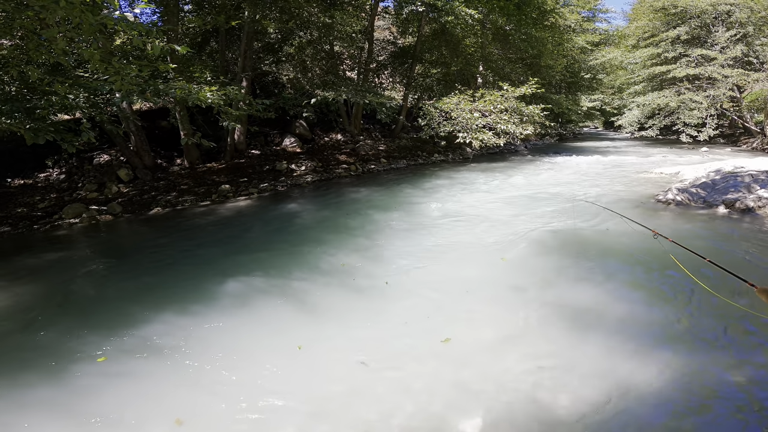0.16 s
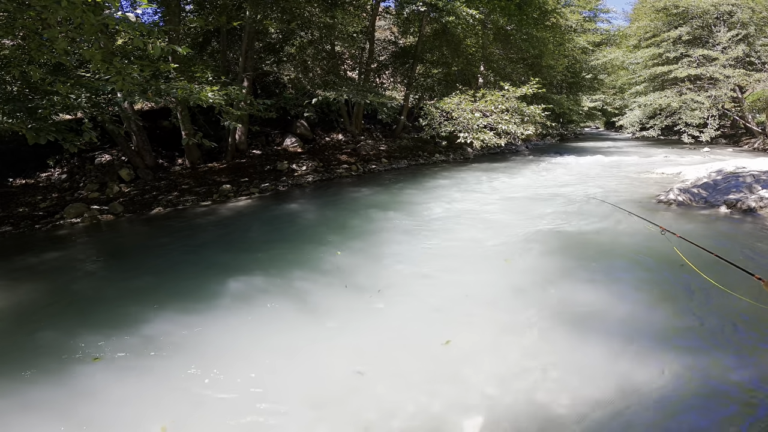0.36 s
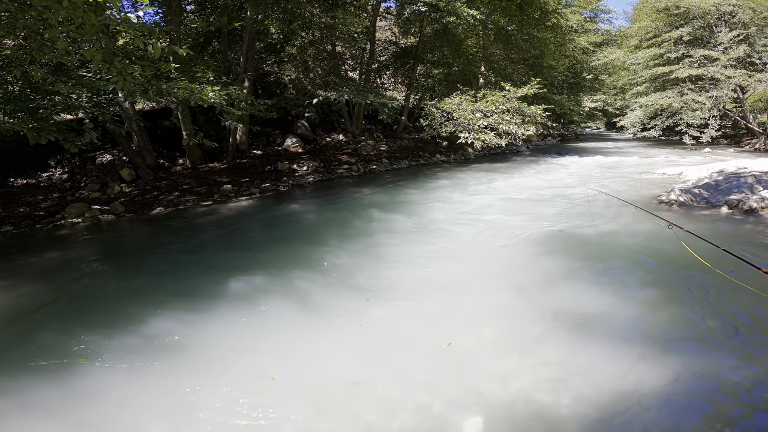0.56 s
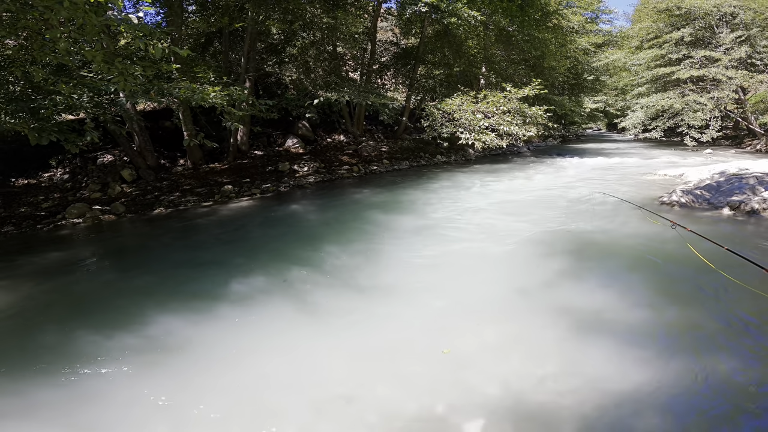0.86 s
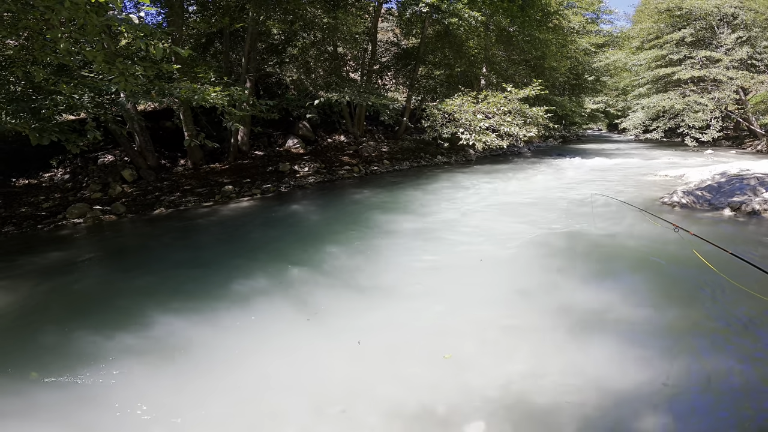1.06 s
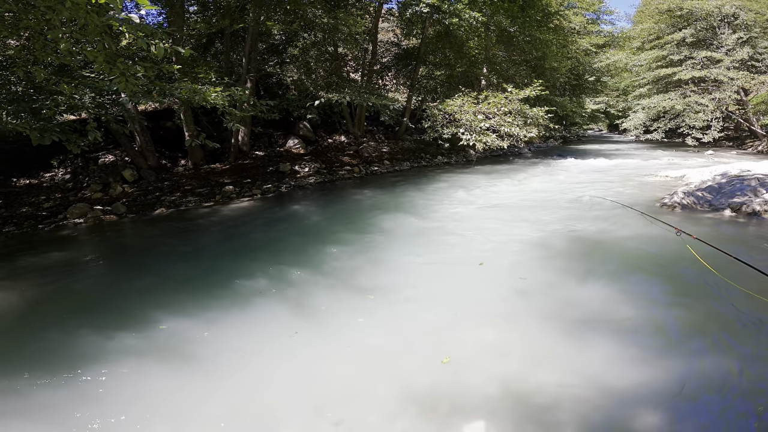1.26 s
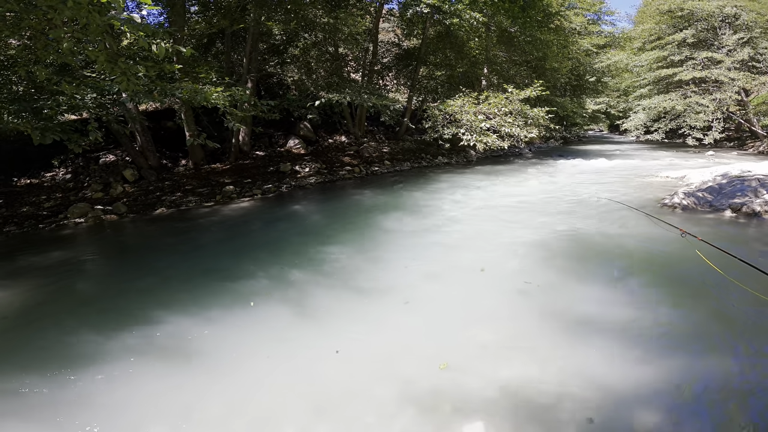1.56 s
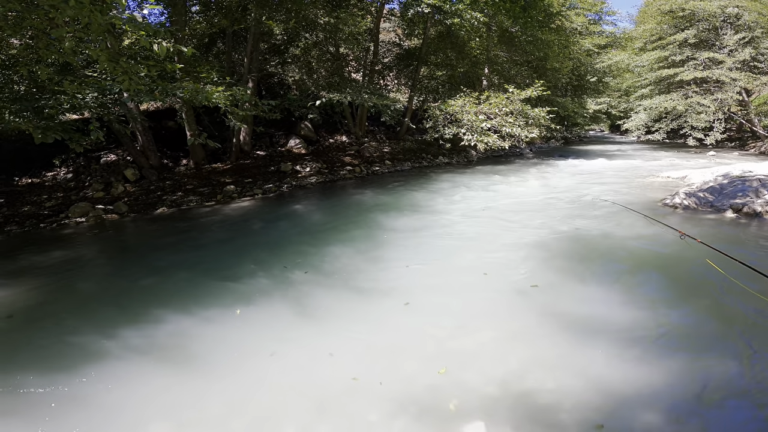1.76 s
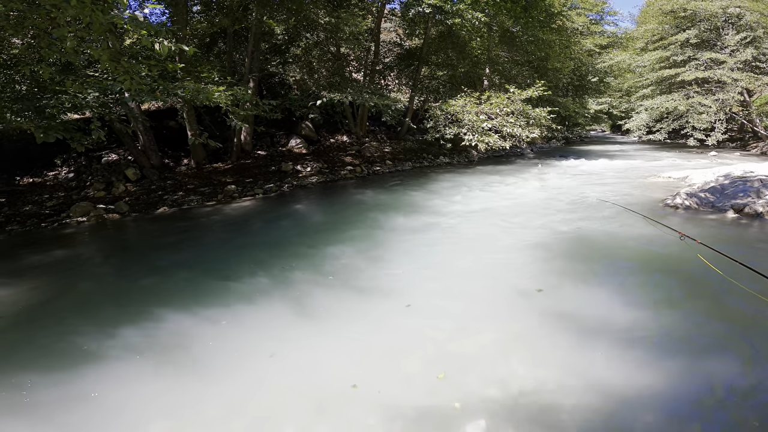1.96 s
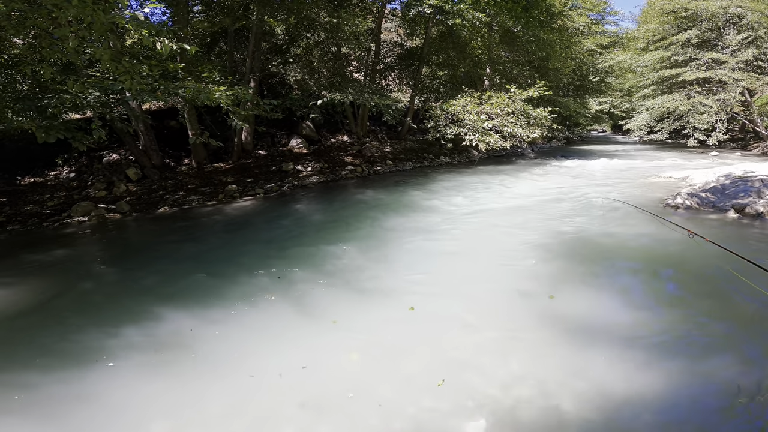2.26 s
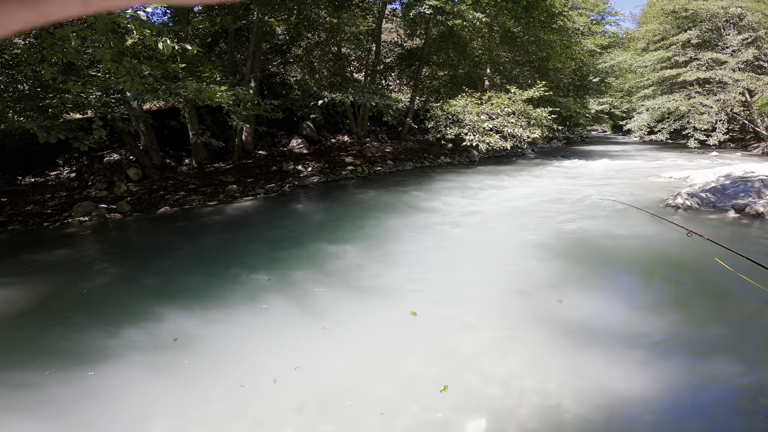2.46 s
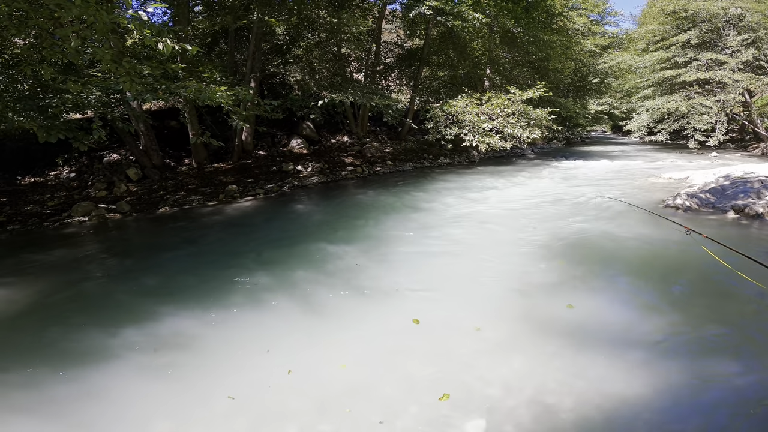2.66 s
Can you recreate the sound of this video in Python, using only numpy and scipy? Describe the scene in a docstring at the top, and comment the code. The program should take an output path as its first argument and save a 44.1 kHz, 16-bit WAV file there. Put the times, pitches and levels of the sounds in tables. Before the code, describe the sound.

Steady rush of a fast river heard from some way off, low and gurgling with scattered watery plops.

```python
"""The steady, dull roar of river rapids, heard from some way off: two bands of coloured noise.
Nearer bubbles gurgle inside the roar, a few single plops stand out and a short run of like bubbles
swells up; each bubble is a fading sine that rises in pitch. A smooth spray hiss of higher noise lies
above, and below is a lumpy rumble of low noise with one soft thump."""
import sys
import numpy as np
from scipy import signal
from scipy.fft import rfft, irfft, next_fast_len
from scipy.io import wavfile
from scipy.ndimage import uniform_filter1d, map_coordinates

SR = 44100
rng = np.random.default_rng(int(sys.argv[2]) if len(sys.argv) > 2 else 0)


def materialize(psi):
    """Save the field psi as 16-bit PCM at rate SR to the path in sys.argv[1].

    A 1-D psi becomes a single channel; in a 2-D psi each row is a channel.
    """
    bounded = np.clip(np.atleast_2d(psi).T, -1, 1)
    quanta = np.round(bounded * 32767).astype(np.int16)
    wavfile.write(sys.argv[1], SR, quanta)


N = 123479  # length in samples

# How loud the roar is over time: t/s, deep level/dB, upper level/dB
ROAR_LEVELS = [(0, -33.5, -35), (.15, -36.5, -35), (.4, -40, -33.5), (.53, -32.5, -34.5), (.66, -37.5, -34),
               (.85, -36.5, -34.5), (1.06, -35.5, -34.5), (1.25, -34.5, -34), (1.5, -37, -35),
               (1.72, -33.5, -33.5), (1.95, -35.5, -33.5), (2.3, -35.5, -34.5), (2.5, -36.5, -34),
               (2.8, -38, -34)]
# Tone colour of the deep roar: f/Hz, relative level/dB (per Hz)
DEEP_ROAR_COLOUR = [(70, -48), (100, -15), (130, -9.5), (180, -1.5), (300, -0.5), (380, -2.5), (520, -54),
                    (900, -85)]
# Tone colour of the upper roar: f/Hz, relative level/dB (per Hz)
UPPER_ROAR_COLOUR = [(200, -56), (290, -9.5), (375, -4), (490, 0), (640, -6.5), (850, -7), (1120, -15),
                     (1500, -23.5), (3000, -100)]
GURGLE_DB = -9  # gurgle level relative to the upper roar's noise


def roar():
    """Countless bubbles merge into noise: a deep band, and an upper band with the gurgle mixed in."""
    deep_db, upper_db = curves(ROAR_LEVELS)
    deep = rush(DEEP_ROAR_COLOUR, patchy_db=0.3)
    upper_noise = rush(UPPER_ROAR_COLOUR, patchy_db=-0.43)
    upper = unit(upper_noise + amp(GURGLE_DB) * gurgle(count=500))
    return amp(deep_db) * deep + amp(upper_db) * upper


GURGLE_HZ, GURGLE_SPREAD = 478.3, 0.2973  # middle pitch, spread of the natural log of pitch
STRENGTH_SCATTER_DB = 1.5  # scale of the random differences in strength


def gurgle(count):
    """Nearer bubbles ring at random moments and pitches, a few much stronger than the rest."""
    draw = rng.random((count, 2))
    start_s = draw[:, 0] * N / SR
    strength_db = -STRENGTH_SCATTER_DB * np.log(draw[:, 1] + 0.0013)  # the offset caps the strongest
    pitch_hz = GURGLE_HZ * np.exp(GURGLE_SPREAD * rng.standard_normal(count))
    return unit(bubbles(start_s, strength_db, pitch_hz))


# Single gulps and plops, one bubble a row: t/s, strength level/dB, starting f/Hz
PLOP_EVENTS = [(0.126, -20.5, 370), (0.5235, -15.5, 800), (0.657, -17.5, 366), (1.042, -19, 360),
               (1.098, -20, 760), (1.121, -21.5, 797), (1.595, -18, 377), (1.682, -22, 375),
               (1.73, -19.5, 362), (2.5, -18, 483), (2.555, -20.5, 395), (2.6, -22, 490)]


def plops():
    """Single large bubbles close by, each ringing at its own pitch."""
    start_s, strength_db, pitch_hz = np.transpose(PLOP_EVENTS)
    return bubbles(start_s, strength_db, pitch_hz)


SWELL_S, SWELL_WIDTH_S = 2.53, .06  # middle and spread in time, seconds
SWELL_DB, SWELL_HZ, SWELL_SPREAD = -30, 508, 0.12  # middle strength, middle pitch, log-pitch spread


def swell(count):
    """A short run of bubbles of nearly one size, so their pitches lie close together."""
    draw = rng.standard_normal((count, 3))
    start_s = np.clip(SWELL_S + SWELL_WIDTH_S * draw[:, 0], 0, N / SR)
    strength_db = SWELL_DB + 2 * draw[:, 1]
    pitch_hz = SWELL_HZ * np.exp(SWELL_SPREAD * draw[:, 2])
    return bubbles(start_s, strength_db, pitch_hz)


CYCLES, RISE, ATTACK_CYCLES = 30, .1, 3.5  # cycles to fade 60 dB, share of pitch gained by then, soft start


def bubbles(start_s, strength_db, pitch_hz):
    """Each bubble is a damped sine that starts softly and rises in pitch."""
    k = np.arange(SR // 10)  # sample numbers within one bubble
    turns = pitch_hz[:, None] * k / SR
    fade = amp(strength_db[:, None] - 60 * turns / CYCLES)
    soft_start = 1 - np.exp(-turns / ATTACK_CYCLES)
    rising_turns = turns * (1 + .5 * RISE * turns / CYCLES)
    tone = fade * soft_start * np.sin(2 * np.pi * rising_turns)
    # add every bubble into one track at its own starting sample
    places = (start_s * SR).astype(int)[:, None] + k
    return np.bincount(places.ravel(), tone.ravel(), N + SR)[:N]


# Tone colour of the spray: f/Hz, relative level/dB (per Hz)
SPRAY_NOISE_COLOUR = [(300, -82), (700, -5.5), (1100, -2), (1600, -2), (2400, -8.5), (3600, -11),
                      (5600, -16.5), (7300, -21.5), (9500, -30), (11700, -38.5), (12700, -36.5),
                      (13900, -45), (15700, -50)]
SPRAY_DB = -42.5  # middle level


def spray():
    """Spray is a smooth hiss: higher noise whose level drifts only slightly."""
    level_db = SPRAY_DB + 0.19 * wobble(6.3)
    return amp(level_db) * rush(SPRAY_NOISE_COLOUR, patchy_db=0.17)


# How loud the rumble is over time: t/s, level/dB
RUMBLE_LEVELS = [(0.05, -50), (0.3, -59.5), (0.35, -46), (0.42, -61), (0.46, -47), (0.56, -54), (0.66, -70),
                 (0.73, -52), (0.75, -63), (1.01, -66), (1.03, -54), (1.48, -62), (1.52, -39), (1.56, -53),
                 (1.75, -55), (2.03, -63), (2.05, -41), (2.11, -54), (2.6, -53), (2.655, -45.5),
                 (2.72, -60), (2.77, -58)]
# Tone colour of the rumble: f/Hz, relative level/dB (per Hz)
RUMBLE_NOISE_COLOUR = [(10, -30), (20, -24), (40, -16), (70, -3.5), (105, -8), (140, -7.5), (240, -86)]
LUMP_DB, LUMPS_PER_S = 4, 28  # depth of the surges, random curve points per second


def rumble():
    """Heavy water surging round the boulders: low noise with quick random changes of level."""
    level_db, = curves(RUMBLE_LEVELS)
    surges = amp(LUMP_DB * wobble(LUMPS_PER_S))
    lumpy = unit(surges * rush(RUMBLE_NOISE_COLOUR, patchy_db=-0.7))
    return amp(level_db) * lumpy


THUMP_S, THUMP_WIDTH_S, THUMP_DB, THUMP_HZ = 2.485, 0.014, -44, 22  # middle, bell width, peak, pitch


def thump():
    """One soft low push: a slow cosine under a bell-shaped swell."""
    t = np.arange(N) / SR - THUMP_S
    bell = np.exp(-.5 * (t / THUMP_WIDTH_S) ** 2)
    return amp(THUMP_DB) * bell * np.cos(2 * np.pi * THUMP_HZ * t)


def rush(colour, patchy_db):
    """Rushing water as coloured noise of rms 1, with random gain patches in time and pitch."""
    z = signal.stft(rng.standard_normal(N), nperseg=512)[2]
    field = rng.standard_normal(z.shape)
    field = uniform_filter1d(field, size=5, axis=0)  # smooth across pitch
    field = uniform_filter1d(field, size=12, axis=1)  # smooth across time
    noise = signal.istft(z * amp(patchy_db * unit(field)), nperseg=512)[1][:N]
    f, db = np.transpose(colour)
    return unit(filtered(noise, lambda hz: amp(np.interp(np.log(hz + 1), np.log(f + 1), db))))


def wobble(rate):
    """A smooth random curve through rate random points a second."""
    return map_coordinates(rng.standard_normal(200), [np.arange(N) * rate / SR], mode="wrap")


def curves(rows):
    """One value per sample for each column after the time, joined by straight lines."""
    s, *cols = np.transpose(rows)
    return [np.interp(np.arange(N) / SR, s, c) for c in cols]


def filtered(x, response):
    """Scale each frequency of x by response(hz); the padding stops the end wrapping to the start."""
    m = next_fast_len(N + SR // 2)
    return irfft(rfft(x, m) * response(np.fft.rfftfreq(m, 1 / SR)), m)[..., :N]


def amp(db):
    """Turn decibels into a plain gain."""
    return 10 ** (np.asarray(db) / 20)


def unit(x):
    """Scale x to an rms (average strength) of 1."""
    return x / np.sqrt(np.mean(x ** 2) + 1e-20)


def scene():
    """Add all the river's layers into one channel."""
    river = roar() + plops() + swell(count=30) + spray() + rumble() + thump()
    return river[None]


TOP_HZ = 15720  # upper edge of the sound


def record(dry):
    """Keep nothing at or above the band limit."""
    return filtered(dry, lambda hz: hz < TOP_HZ)


dry = scene()
out = record(dry)
materialize(out)
```